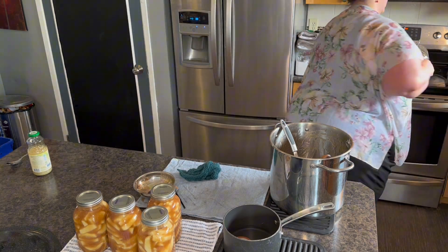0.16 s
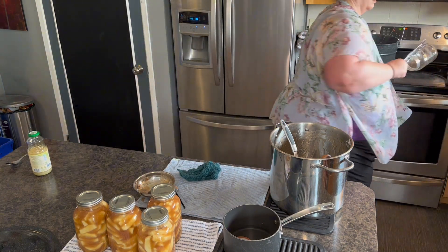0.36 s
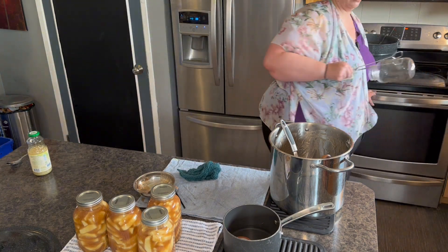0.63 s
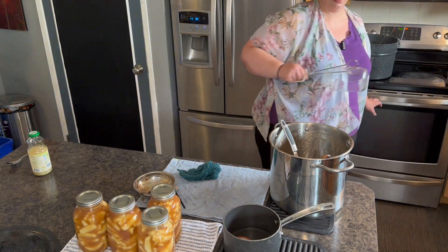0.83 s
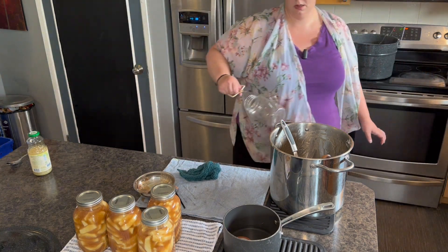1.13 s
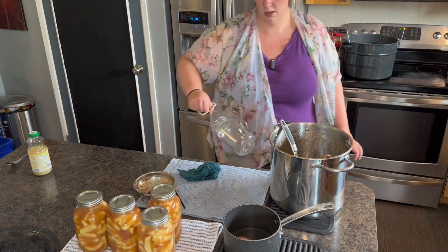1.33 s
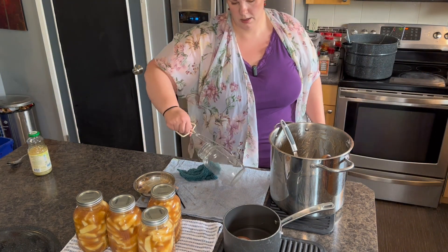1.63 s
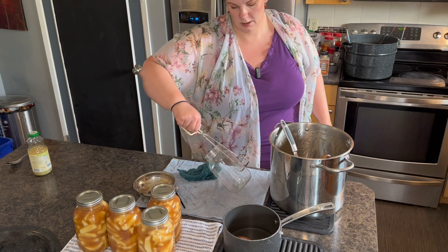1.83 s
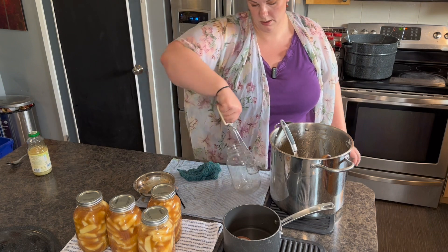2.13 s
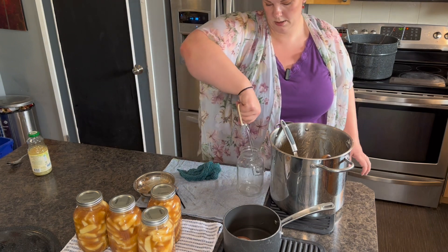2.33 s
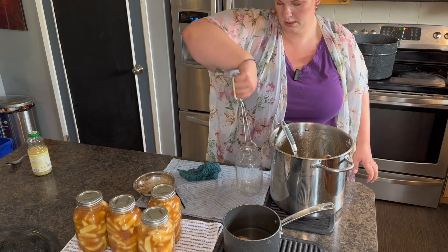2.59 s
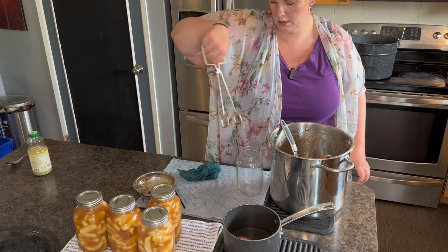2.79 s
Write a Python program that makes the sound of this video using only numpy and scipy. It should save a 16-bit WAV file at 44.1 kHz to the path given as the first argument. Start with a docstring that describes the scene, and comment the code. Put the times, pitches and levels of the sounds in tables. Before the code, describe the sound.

Glass jar clinks sharply onto a counter after a metal clatter and light tong ticks

```python
"""Struck glass in a kitchen

An empty glass jar, carried in metal tongs, is set down with one bright clink: damped modes ring over noise.
Before it, metal clatters at the stove (chattering noise and modes) and the tongs tick against the glass
(noise clicks and short modes) as the jar is turned upright. A clip-on microphone picks up moving clothes,
low swells for bumps and hiss for swishes; a dull knock and steady room noise are shaped noise."""
import sys
import numpy as np
from scipy import signal
from scipy.fft import rfft, irfft
from scipy.io import wavfile
from scipy.ndimage import uniform_filter1d

SR = 44100
rng = np.random.default_rng(int(sys.argv[2]) if len(sys.argv) > 2 else 0)


def put_to_file(sound):
    """Save the sound as 16-bit audio at rate SR, in the file named by the first command-line argument."""
    columns = np.atleast_2d(sound).T  # one column per channel
    safe = np.clip(columns, -1, 1)
    whole_steps = np.round(safe * 32767)
    wavfile.write(sys.argv[1], SR, whole_steps.astype(np.int16))


N = 130095
SOUND_S = 0.5  # longest duration of a single event
T = np.arange(int(SOUND_S * SR)) / SR
RING_RISE_S = 0.0015  # time constant of the soft start of every ring

# Noise spectra give relative density; noise() then sets their rms to 1.
# Kitchen background spectrum: [f/Hz, density/dB per Hz]
KITCHEN_SPECTRUM = [(12, -11.5), (20, 8), (38, -1), (70, -10.5), (134, -6), (198, -9), (228, -3.5),
                    (446, -5), (499, -3), (678, -7), (825, -8), (1810, -12.5), (2460, -24), (2670, -22),
                    (4540, -25.5), (12400, -31.5), (16000, -31)]
KITCHEN_DB = -48.5
# Decay of the diffuse room tail: [f/Hz, t60/s]
ROOM_DECAY = [(200, 0.12), (2000, 0.14), (8000, 0.24), (15000, 0.6)]
ROOM_DELAY_S = 0.004

# Clothes bumping the microphone: [t/s at the peak, level/dB, f/Hz, half-width to exp(-2)/s]
BUMPS = [(.265, -49.5, 68.6, 0.046), (.41, -30.5, 33, 0.029), (0.424, -58, 87, 0.064),
         (0.465, -39, 43.6, 0.075), (.51, -46, 174, 0.028), (1.177, -36.5, 60, 0.053),
         (1.298, -38.5, 65.3, 0.032), (1.367, -29.5, 95, 0.016), (1.403, -31, 57.6, 0.026),
         (1.447, -31, 62, 0.017), (1.485, -39.5, 42.7, 0.12), (1.56, -43, 68.4, 0.065),
         (1.65, -33, 75.4, 0.026), (1.702, -40.5, 45, 0.11), (1.761, -40.5, 48, 0.031),
         (1.843, -38, 72, 0.01), (2.584, -40.5, 60, 0.02), (2.619, -26.5, 48, 0.015),
         (2.69, -40, 67.4, 0.022), (2.764, -32.5, 84, 0.0067)]
# Rumble within a bump: [f/Hz, density/dB per Hz]
RUMBLE_SPECTRUM = [(20, 4.5), (110, 13.5), (220, -1), (500, -22.5), (2000, -86.5)]
RUMBLE_GAIN = 0.39
# Cloth swishing: [t/s at the peak, level/dB, half-width to exp(-1)/s]
SWISHES = [(.03, -59, 0.1), (0.325, -59, 0.15), (0.561, -51.5, 0.034), (1.233, -57.5, 0.042),
           (1.506, -58, 0.05), (2.48, -60, .07)]
# Hiss of the cloth: [f/Hz, density/dB per Hz]
SWISH_SPECTRUM = [(500, -14), (2000, 3.5), (4500, 0.5), (7000, -2.5), (12000, -1), (15500, -20.5)]

# Dull knock across the room: [t/s, level/dB]
KNOCKS = [(.114, -37.5)]
# Spectrum of the knock: [f/Hz, density/dB per Hz]
KNOCK_SPECTRUM = [(40, -11), (130, -1), (280, -1), (600, -9.5), (1200, -14), (3000, -40), (12000, -39)]
KNOCK_T60_S = 0.41

# Clatter at the stove: [t/s, level/dB, treble tilt of the noise/dB per octave]
CLACKS = [(0.3772, -2.5, 2), (.381, -8.5, -1), (0.389, -8.5, 0.5), (.397, -15, -0.5), (0.4374, -19, 7),
          (0.56, -31.5, -2.5)]
# Modes of the stove metal: [f/Hz, level/dB, t60/s]
METAL_MODES = [(1250, -32.5, 0.19), (1490, -37, 0.17), (2183, -28, 0.17), (2297, -28, 0.2),
               (3720, -32, 0.34), (4250, -33.5, 0.31), (4460, -45, 0.18), (6100, -29, 0.12),
               (7100, -21, 0.075), (11700, -23, 0.065)]
METAL_FLUTTER, METAL_FLUTTER_HZ = 0.9, 50  # relative depth, bandwidth
# Dense clatter spectrum: [f/Hz, density/dB per Hz]
CLATTER_SPECTRUM = [(88, -45), (150, -5.5), (514, -6.5), (601, -12.5), (1240, -8), (1980, -7.5),
                    (2180, -4.5), (2920, -9.5), (4160, -6), (5150, -11.5), (6770, -7), (10200, -17),
                    (13400, -17.5), (16000, -23)]
# Decay of the dense clatter: [f/Hz, t60/s]
CLATTER_DECAY = [(200, 0.48), (1000, 0.81), (3000, .3), (7000, 0.3), (15000, 0.3)]
CLATTER_DB = -24.5
CHATTER_DB, CHATTER_HZ = 1, 292  # rms level flicker, rate above which it falls away

# Tongs rattling on the jar: [t/s, ring level/dB, most excited f/Hz, click level/dB]
TICKS = [(0.717, -50, 2760, -70), (1.7558, -42, 9880, -50.5), (1.7961, -29.5, 2300, -44.5),
         (1.8187, -26.5, 2530, -39), (1.8484, -28, 3840, -33)]
# Modes of the tongs and the jar they touch: [f/Hz, level/dB, t60/s]
RATTLE_MODES = [(358, -1.5, .22), (2350, -27, 0.053), (2431, 5.5, 0.038), (2490, -5.5, 0.16),
                (2860, 1.5, 0.072), (2954, -3, 0.098), (3920, 7, 0.017), (4250, -17, 0.15), (6050, -7, .1),
                (7840, -8, .07), (9460, -5, 0.16), (9700, -15, .09), (11400, -5, 0.074)]
FOCUS_OCTAVES, OFF_FOCUS_DB = 0.29, -17.5  # half-width to exp(-1), level far from the focus
# Light touches as the hanging jar swings upright: [t/s, ring level/dB, click level/dB]
TOUCHES = [(2.191, -78, -62), (2.225, -45.5, -54), (2.262, -52, -51), (2.2862, -43.5, -49.5),
           (2.4083, -67, -53.5), (2.448, -71.5, -62), (2.511, -61.5, -61)]
# Modes of the light touches: [f/Hz, level/dB, t60/s]
TOUCH_MODES = [(2600, -6, .07), (3095, 0, .24), (4710, -9, .18), (9950, -17, .14), (11600, -18, .12)]
TONG_FLUTTER, TONG_FLUTTER_HZ = 0.47, 60  # relative depth, bandwidth
# Spectrum of each click: [f/Hz, density/dB per Hz]
CLICK_SPECTRUM = [(300, -15), (1900, -29), (2450, -2.5), (3000, 5), (4200, 1), (5300, -12.5), (6100, -6.5),
                  (6900, -9), (10000, -8.5), (13000, -12.5), (15500, -17.5)]
CLICK_T60_S, CLICK_ROOM_DB = 0.057, -3.5

# Contacts of the jar's base: [t/s, level of crack and shimmer/dB]
LANDING = [(2.6313, -10), (2.6343, -2)]
# Frequencies of the clear glass modes: [f/Hz]
GLASS_HZ = [359, 675, 1448, 2653, 3060, 4006, 5327, 6712, 8205, 8936, 9179, 9282, 9454, 9926, 10146, 11310,
            11385]
# The same modes in order: [level/dB, t60/s before the faster late fall]
GLASS_MODES = [(-27.5, 0.28), (-43.5, 0.31), (-25.5, .21), (-17.5, 0.27), (-28, 0.23), (-24, 0.43),
               (-22.5, 0.45), (-34, 0.34), (-34.5, .35), (-27.5, .27), (-16, .19), (-12.5, 0.17),
               (-30, 0.49), (-27, .29), (-27.5, .23), (-12, .14), (-5, 0.14)]
GLASS_DB, GLASS_FLUTTER, GLASS_FLUTTER_HZ = 4, 0.76, 30  # level, relative depth, bandwidth
# Crowd of weaker glass modes: [f/Hz, density/dB per Hz]
SHIMMER_SPECTRUM = [(300, -26.5), (450, -15.5), (680, -18.5), (1000, -26.5), (1550, -20), (1950, -17.5),
                    (2600, -12.5), (3100, -12), (3350, -18), (3900, -9.5), (4500, -10), (4800, -24),
                    (5350, -0.5), (5950, -18), (7700, -12.5), (8200, -3), (9200, -1), (10600, 1.5),
                    (11400, -1), (12900, 1), (13400, -10), (15000, -4.5), (15900, -25)]
# Decay of that crowd: [f/Hz, t60/s before the faster late fall]
SHIMMER_DECAY = [(400, .22), (2500, 0.41), (6000, 0.32), (9500, .35), (12000, 0.21), (15500, 0.19)]
SHIMMER_DB = -8.5
# Crack of contact: [f/Hz, density/dB per Hz]
CRACK_SPECTRUM = [(200, -7), (900, -42.5), (1600, -14.5), (2700, -4), (4500, -9.5), (5500, 3),
                  (6800, -41.5), (9000, -0.5), (11500, -2.5), (15500, -9.5)]
CRACK_DB, CRACK_T60_S = -3, 0.047
TAIL_FALL_S = 0.25  # the ring's tail falls faster late on: extra factor exp(-1) at this delay

CEILING_DB, RECOVER_DB_PER_S = -8.5, 6.5  # limiter: short-term power, recovery
CLIP_PEAK, EDGE_HZ = 0.92, 16100  # clipping amplitude, band limit


def amp(db):
    """Logarithmic level: decibels become an amplitude gain."""
    return 10 ** (np.asarray(db) / 20)


def unit(x):
    """Normalization: mean power is set to one."""
    return x / np.sqrt(np.mean(x ** 2) + 1e-20)


def read(points, hz):
    """Interpolation: a table is read along a logarithmic frequency axis."""
    f, value = np.transpose(points)
    return np.interp(np.log(hz + 1), np.log(f + 1), value)


def add(mix, s, sound):
    """Superposition: a sound starting at time s is summed into the mix, trimmed at its ends."""
    start = round(s * SR)
    sound = sound[max(-start, 0):]
    part = mix[max(start, 0):][:len(sound)]
    part += sound[:len(part)]


def fade(t60):
    """Exponential damping: amplitude falls by 60 dB in t60."""
    return np.exp(-np.log(1000) * T / max(t60, 1e-3))


def noise(spectrum, size, tilt_db=0):
    """Random-phase synthesis: a prescribed spectrum, tilted per octave, becomes noise of rms 1."""
    hz = np.fft.rfftfreq(size, 1 / SR)
    gain = amp(read(spectrum, hz) + tilt_db * np.log2(hz + 1))
    phase = 2 * np.pi * rng.random(len(hz))
    return unit(irfft(gain * np.exp(1j * phase), size))


def die_away(x, decay):
    """Frequency-dependent damping: overlapping bands each decay at their own rate."""
    hz, spectrum = np.fft.rfftfreq(len(x), 1 / SR), rfft(x)
    centres = [f for f, _ in decay]
    out = np.zeros(len(x))
    for weights, (_, t60) in zip(np.eye(len(decay)), decay):
        band_gain = read(list(zip(centres, weights)), hz)
        out += irfft(spectrum * band_gain, len(x)) * fade(t60)
    return out


def ring(modes, flutter, flutter_hz):
    """Modal vibration: one blow starts damped modes; reflections make each flutter in level and phase."""
    out = np.zeros(len(T))
    smooth = 1 / (1 + (np.fft.fftfreq(len(T), 1 / SR) / flutter_hz) ** 2)
    for hz, db, t60 in modes:
        waver = np.fft.ifft(smooth * np.exp(2j * np.pi * rng.random(len(T))))
        envelope = fade(t60) * (1 + flutter * waver / np.std(waver))
        # The flutter leaves the energy of the envelope unchanged.
        envelope *= np.linalg.norm(fade(t60)) / np.linalg.norm(envelope)
        out += amp(db) * (envelope * np.exp(2j * np.pi * hz * T)).imag
    return out * (1 - np.exp(-T / RING_RISE_S))


def in_room(x, room_db):
    """Reverberation: convolution with decaying noise adds the short diffuse tail of the kitchen."""
    tail = die_away(rng.standard_normal(len(T)), ROOM_DECAY) * (T > ROOM_DELAY_S)
    tail /= np.linalg.norm(tail)
    return x + amp(room_db) * signal.fftconvolve(x, tail)[:N]


def kitchen():
    """Stationary noise: the quiet room has a fixed spectrum and a steady level."""
    return amp(KITCHEN_DB) * noise(KITCHEN_SPECTRUM, N)


def clothes():
    """Friction and contact: a bump is a swell of low tone and rumble, a swish a swell of hiss."""
    out = np.zeros(N)
    t = T - SOUND_S / 2  # time from the peak of the swell
    for s, db, hz, half_width in BUMPS:
        tone = np.sin(2 * np.pi * (hz * t + rng.random()))
        push = tone + RUMBLE_GAIN * noise(RUMBLE_SPECTRUM, len(T))
        add(out, s - SOUND_S / 2, amp(db) * np.exp(-2 * (t / half_width) ** 2) * push)
    for s, db, half_width in SWISHES:
        swell = np.exp(-(t / half_width) ** 2)
        add(out, s - SOUND_S / 2, amp(db) * swell * noise(SWISH_SPECTRUM, len(T)))
    return out


def knocks():
    """Heavily damped impact: a dull blow is decaying low noise with no ring."""
    out = np.zeros(N)
    for s, db in KNOCKS:
        add(out, s, amp(db) * noise(KNOCK_SPECTRUM, len(T)) * fade(KNOCK_T60_S))
    return out


def stove():
    """Repeated impact: each clack joins metal modes to dense noise that flickers as loose metal chatters."""
    out = np.zeros(N)
    flicker_spectrum = [(30, -30), (80, 0), (CHATTER_HZ, 0), (2 * CHATTER_HZ, -80)]
    for s, db, tilt_db in CLACKS:
        dense = amp(CLATTER_DB) * die_away(noise(CLATTER_SPECTRUM, len(T), tilt_db), CLATTER_DECAY)
        chatter = unit(amp(CHATTER_DB * noise(flicker_spectrum, len(T))))
        modes = ring(METAL_MODES, METAL_FLUTTER, METAL_FLUTTER_HZ)
        add(out, s, amp(db) * (dense * chatter + modes))
    return out


def tongs():
    """Selective excitation: clicks start short rings; a rattle's contact point favours modes near one pitch."""
    clicks, rings = np.zeros((2, N))
    for s, db, focus_hz, _ in TICKS:
        modes = []
        for hz, mode_db, t60 in RATTLE_MODES:
            nearness = np.exp(-(np.log2(hz / focus_hz) / FOCUS_OCTAVES) ** 2)
            modes.append((hz, db + mode_db + OFF_FOCUS_DB * (1 - nearness), t60))
        add(rings, s, ring(modes, TONG_FLUTTER, TONG_FLUTTER_HZ))
    for s, db, _ in TOUCHES:
        add(rings, s, amp(db) * ring(TOUCH_MODES, TONG_FLUTTER, TONG_FLUTTER_HZ))
    for s, *_, click_db in TICKS + TOUCHES:
        add(clicks, s, amp(click_db) * noise(CLICK_SPECTRUM, len(T)) * fade(CLICK_T60_S))
    return rings + in_room(clicks, CLICK_ROOM_DB)


def jar():
    """Impact on a shell: two contacts crack and shimmer; the harder one rings the glass in clear modes."""
    out = np.zeros(N)
    tail_fall = np.exp(-(T / TAIL_FALL_S) ** 4)
    for s, db in LANDING:
        crack = amp(CRACK_DB) * noise(CRACK_SPECTRUM, len(T)) * fade(CRACK_T60_S)
        shimmer = amp(SHIMMER_DB) * die_away(noise(SHIMMER_SPECTRUM, len(T)), SHIMMER_DECAY)
        add(out, s, amp(db) * (crack + shimmer) * tail_fall)
    modes = [(hz, db, t60) for hz, (db, t60) in zip(GLASS_HZ, GLASS_MODES)]
    clear_ring = amp(GLASS_DB) * ring(modes, GLASS_FLUTTER, GLASS_FLUTTER_HZ)
    add(out, LANDING[-1][0], clear_ring * tail_fall)
    return out


def scene():
    """Superposition: the pressures of all sources add at one microphone."""
    return (kitchen() + clothes() + knocks() + stove() + tongs() + jar())[None]


def record(dry):
    """Dynamic limiting: loud power is ducked with slow recovery; stray peaks clip; a low-pass follows."""
    recovery = RECOVER_DB_PER_S * np.arange(N) / SR
    power = abs(uniform_filter1d(dry[0] ** 2, size=400))
    over_db = np.maximum(10 * np.log10(power + 1e-12) - CEILING_DB, 0)
    # The running maximum holds each reduction while it recovers at a constant rate.
    duck_db = np.maximum.accumulate(over_db + recovery) - recovery
    clipped = np.clip(dry / amp(duck_db), -CLIP_PEAK, CLIP_PEAK)
    low_pass = signal.firwin(511, EDGE_HZ, window=("kaiser", 9), fs=SR)
    return signal.oaconvolve(clipped, low_pass[None], "same")


dry = scene()
out = record(dry)
put_to_file(out)
```